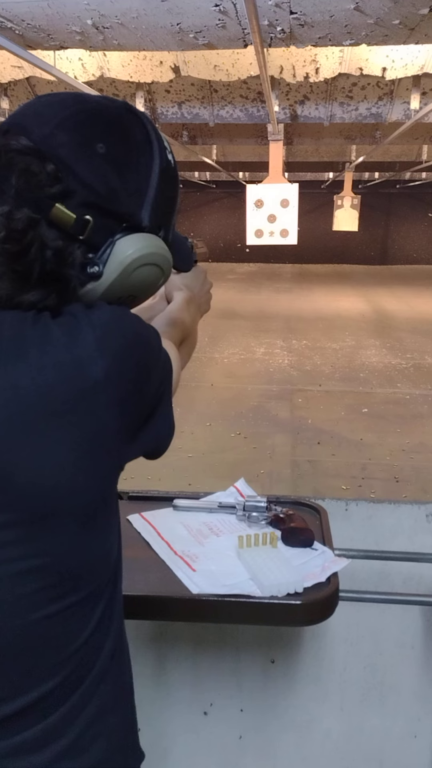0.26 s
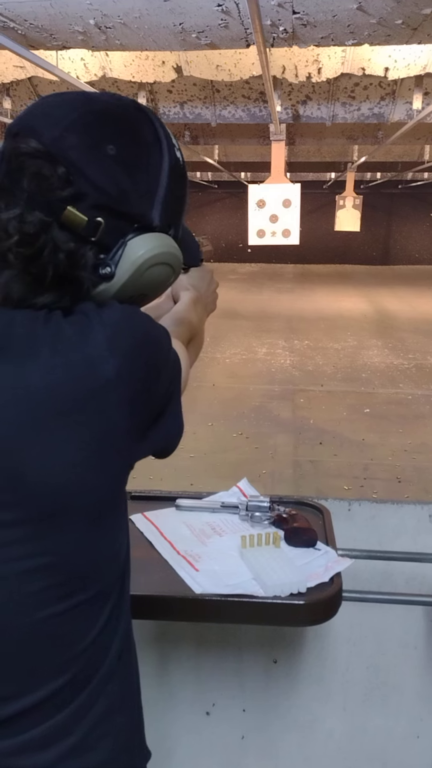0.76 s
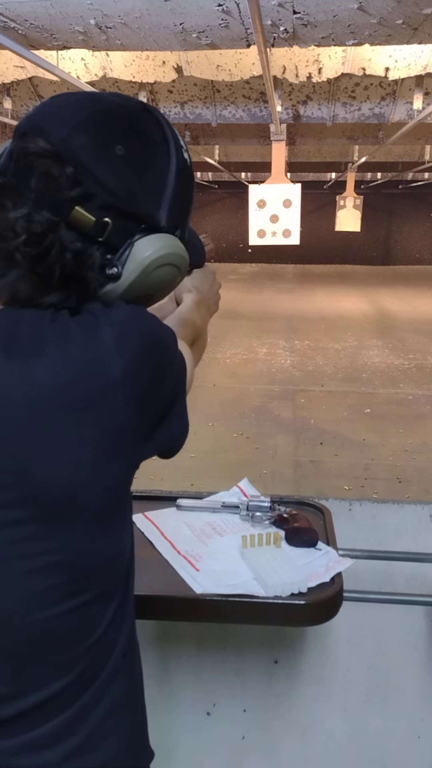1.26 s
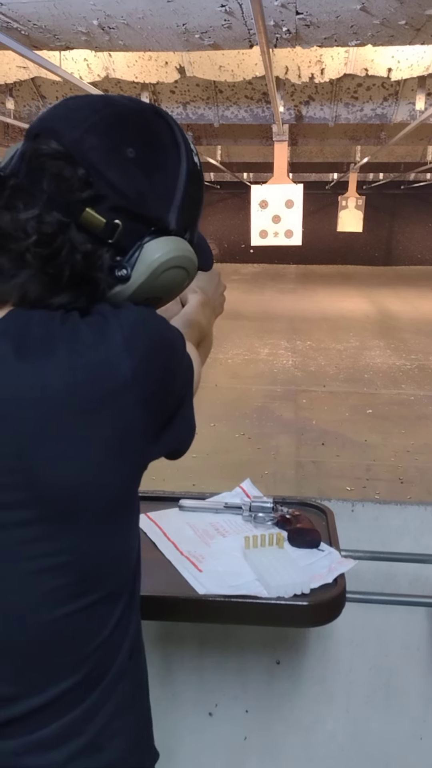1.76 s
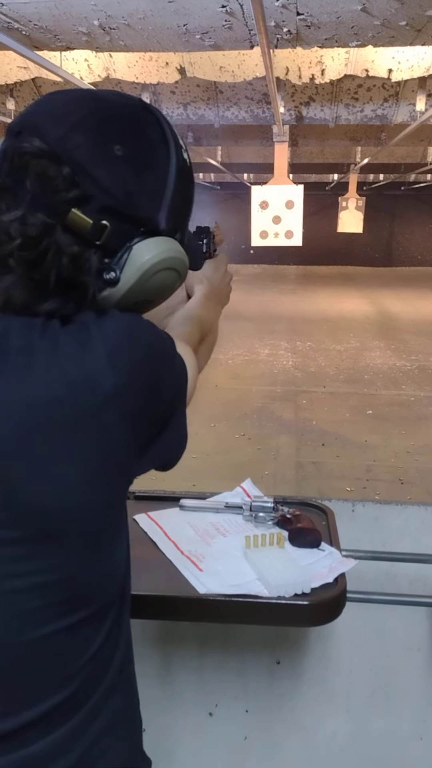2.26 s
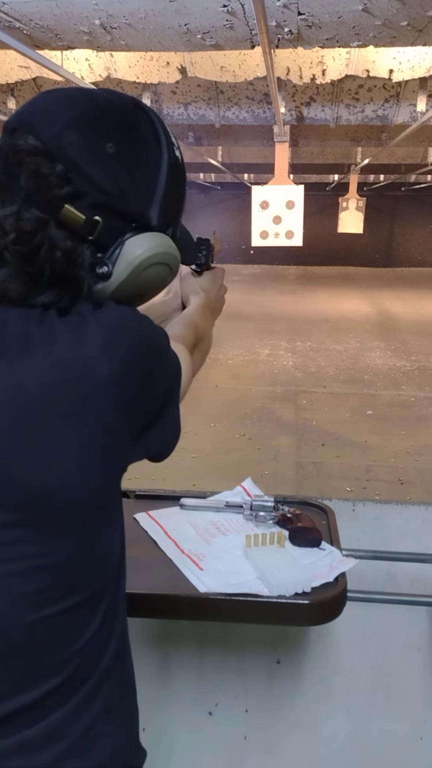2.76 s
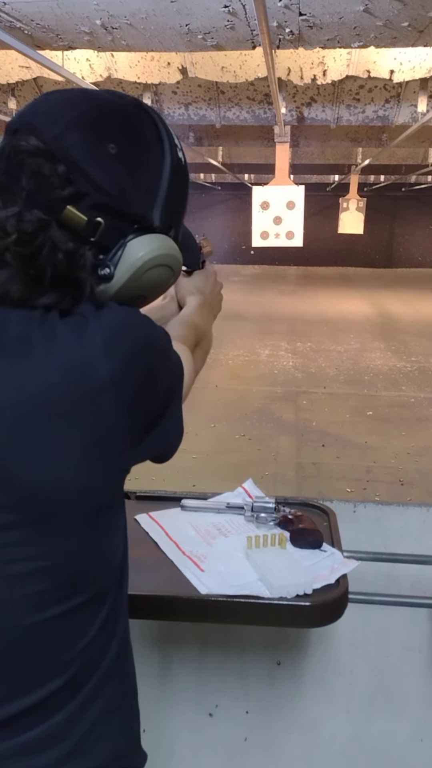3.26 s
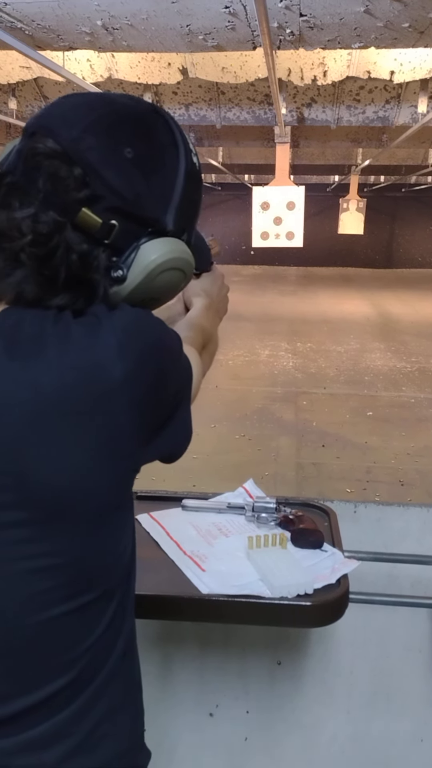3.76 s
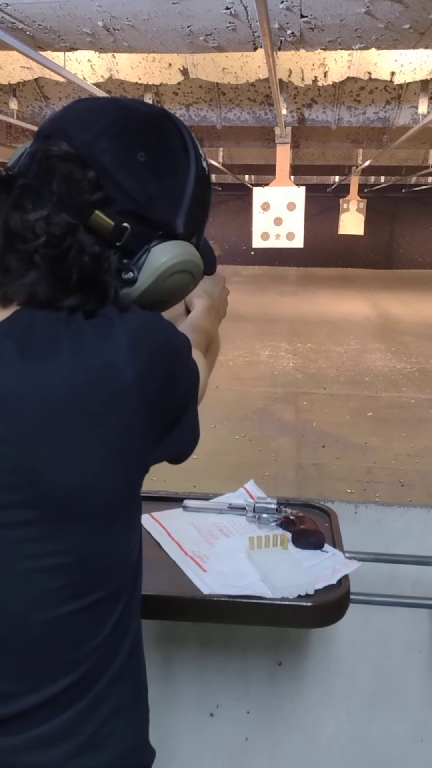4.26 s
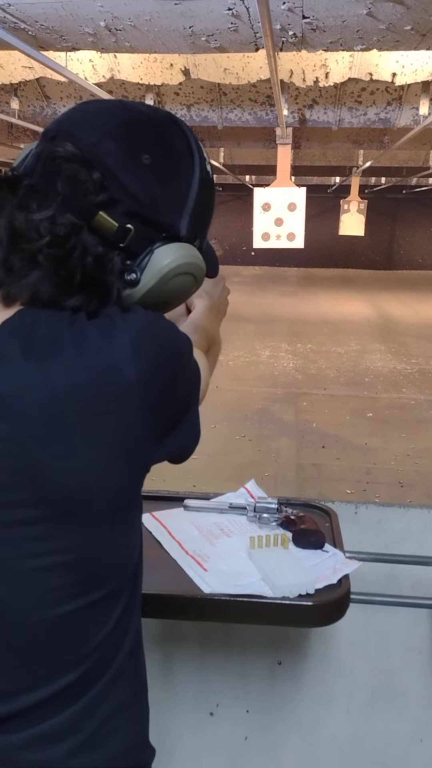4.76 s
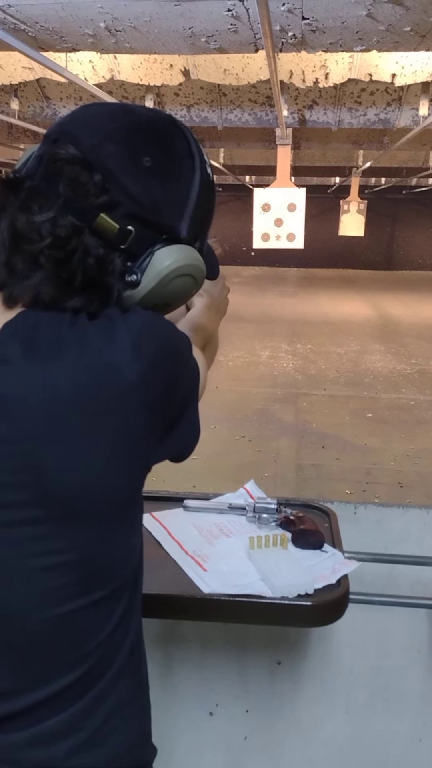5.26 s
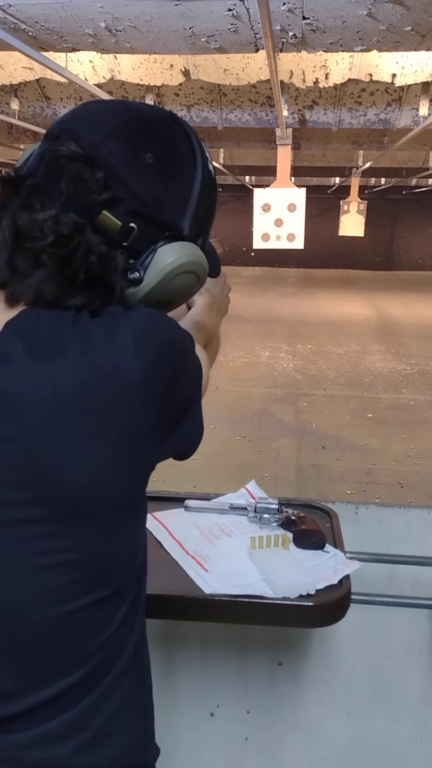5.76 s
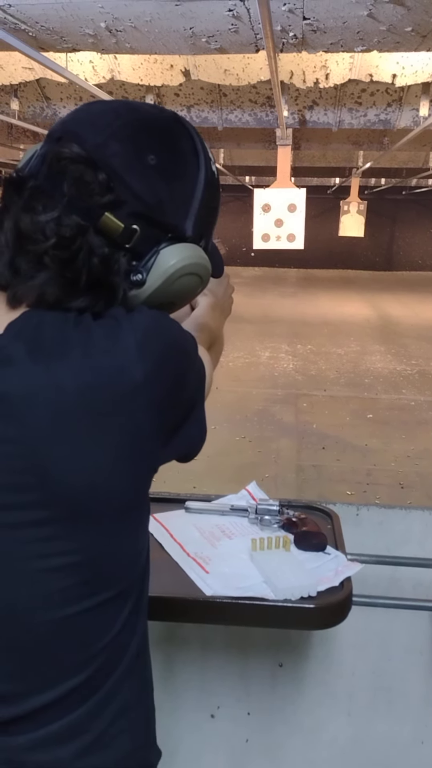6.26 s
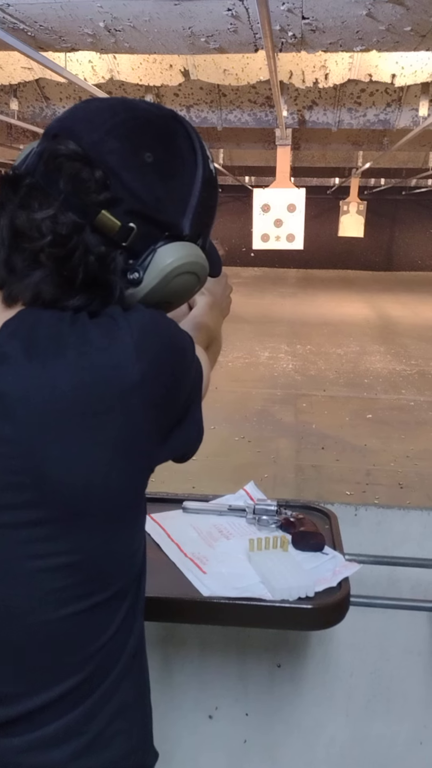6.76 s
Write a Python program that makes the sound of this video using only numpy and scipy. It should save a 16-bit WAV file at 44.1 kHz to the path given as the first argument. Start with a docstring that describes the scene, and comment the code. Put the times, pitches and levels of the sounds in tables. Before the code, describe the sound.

Four loud handgun blasts in a long hard-walled hall, each roaring and ringing out, with brass cases clinking over a low ventilation rush.

```python
"""Handgun fire in a reverberant hall

A handgun is fired four times in a long, hard-walled indoor range with the ventilation running.
Each blast is noise in bands that build up and decay at their own rates, the treble dying first, plus
ringing standing waves and a slap; a limiter holds the roar flat for most of a second. Spent brass cases
bounce as noise-driven resonances; clacks and knocks are short bursts; rustle and air are shaped noise."""
import sys
import numpy as np
from scipy import signal
from scipy.io import wavfile

SR = 44100
rng = np.random.default_rng(int(sys.argv[2]) if len(sys.argv) > 2 else 0)


def wav_record(signal):
    """Record a signal, one row per channel, as 16-bit PCM in the file named by sys.argv[1]."""
    frames = np.transpose(np.atleast_2d(signal))
    bounded = np.clip(frames, -1, 1)
    # unit amplitude maps onto the largest positive 16-bit level
    quanta = np.round(bounded * 32767).astype(np.int16)
    wavfile.write(sys.argv[1], SR, quanta)


N = 309141

# Shots: start_s, level_db, extra_bass_db, extra_treble_db, early_knock_db, slap_db (against level_db),
# bass_build_up_factor, treble_t60_factor, late_swell_s (after the shot), late_swell_db
SHOTS = [(1.9412, 15, 3, 7, -24.5, -32, 1.2215, 1.0533, .7, -1.5),
         (3.6402, 14, -3, 5, -14.5, -7, .9, 0.96164, 0.5637, -5),
         (5.1755, 13.5, -2, 4.5, -16, -10.5, 1.2, 0.98379, 0.5972, -5),
         (6.792, 4, 0.5, 4.5, -17, -11, 1.669, 0.9211, .58, -6.5)]
# Reverberation of the hall: pitch_hz, level_db (per Hz), t60_s, build_up_s, slow_tail_db, decay_bend
HALL = [(45, -20.5, 2.5, 0.36, -30, 1.04), (88.78, -5.5, 2.7402, 0.47, -26.5, 1.1473),
        (164, 4, 1.4443, 0.28, -20, 0.9681), (300.4, 1, 1.5399, 0.25, -29.5, 1.4211),
        (417, 1.5, 1.8758, 0.045, -27, 0.9664), (835.1, 4.5, 1.671, 0.034, -27, 1.0091),
        (1320, 2, 1.7085, 0.0046, -28, 0.88468), (2364.7, -5, 1.7614, 0.0048, -38.5, 1.0625),
        (3033.8, 3.5, 1.2672, 0.03, -46, 1.0477), (4170.5, -2, 0.99217, 0.0057, -55, 1.4117),
        (6488.9, -6, 0.74165, 0.012, -67.5, 1.4139), (9089, -16.5, 0.61543, 0.019, -74.5, 1.4837),
        (13398, -17.5, 0.52857, 0.022, -81.5, 1.585), (16500, -25, .55, 0.017, -82.5, 1.3)]
SLOW_TAIL_T60_S = 4.2664
FIRST_SHARE = 0.295   # part of the roar's amplitude that is there at once
SWELL_WIDTH_S, SWELL_TOP_HZ = 0.12, 480   # bell-shaped late swell, fading out above this pitch
# Renewal of the roar: pitch_hz, fresh_share (part of the power that is shifted in time for each shot)
FRESH_SHARES = [(100, .1), (1000, .2), (4000, .6)]
# Standing waves of the hall: pitch_hz, width_hz, level_db, t60_s
STANDING_WAVES = [(142.73, 22, -6, 2.816), (228.3, 28, -11, 1.3), (352.32, 20, -7, 2.2505),
                  (574.71, 41, 1.5, 2.4585), (599.54, 27, -3, 2.9307), (766.92, 11, 2, 2.0924),
                  (802.93, 14, -7.5, 2.6886), (915.9, 11, -9.5, 0.93), (1008.6, 25, -1.5, 2.9536),
                  (1088.5, 16, -1, 2.3015), (1340.2, 14, -8, 2.804), (1514, 12, -9.5, 0.7),
                  (1797.3, 15, -9.5, 0.67), (2545, 12, -13.5, 0.79)]
STANDING_WAVES_DB = -27.5   # against the level of the shot
KNOCK_LEAD_S, KNOCK_HZ, KNOCK_WIDTH_HZ = 0.0053, 900, 760   # dull knock just ahead of each blast
SLAP_HZ, SLAP_WIDTH_HZ, SLAP_T60_S = 902, 660, .1   # first slap off the booth walls
SLAP_TAIL_DB, SLAP_TAIL_T60_S = -14.5, .7   # weaker, longer part of the slap
THUD_HZ, THUD_WIDTH_HZ, THUD_DB = 230, 280, -4   # low body of the slap
PUSH_HZ, PUSH_WIDTH_HZ, PUSH_DB, PUSH_T60_S = 85, 110, -16.5, .35   # low push of air with the slap
# Late echo, minute and brief: delay_s, level_db (against the shot), pitch_hz, width_hz, broad_crack_db,
# t60_s, left_right_db, rise_s
LATE_ECHO = (1.95, -33.5, 1010, 299.5, -43, 0.0015, -2, 0.48)

# Bounces of brass cases: start_s, body_db, mouth_ring_hz, mouth_ring_db, mouth_ring_t60_s, floor_crack_db
CASES = [(2.515, -42, 12100, -46, 0.2532, -60.5), (2.8217, -18.5, 14970, -27, 0.2524, -31.5),
         (3.3503, -26.5, 14890, -34, 0.2191, -42.5), (4.44, -60.5, 13400, -63.5, .4, -90.5),
         (4.69, -63, 11150, -73, 0.29, -89)]
# Modes of a case body: pitch_hz, width_hz, level_db, t60_s
CASE_MODES = [(3124.5, 223.6, 4, 0.1293), (3879, 300, -14, .08), (5005.4, 150, -19, 0.087),
              (6340, 60, -35, 0.17), (6489.8, 110, -18, 0.044)]
# Crack of a case on the floor: pitch_hz, width_hz, broad_crack_db, t60_s, left_right_db, rise_s
CASE_CRACK = (4000, 3000, 14.342, 0.19487, 3, .0004)
MOUTH_WIDTH_HZ = 60
CLINK_DB, CLINK_T60_S = 4, .035   # part added to the first instant of a bounce

# A loose metal part rattles: start_s, level_db, pitch_hz, touches, broad_crack_db, left_right_db
RATTLES = [(.003, -52, 2298, 1, -3, -4), (.228, -47, 2346, 1, 0.5, -7.5), (.237, -39, 2355, 5, -1, -4),
           (.3865, -56, 2295, 3, -6, -4), (0.435, -53.5, 2367, 3, -5, -5.5), (.654, -56, 2552, 2, 1, 2.5),
           (.999, -53.5, 2549, 2, 1.5, -1), (1.155, -64.5, 3699, 3, -2, 0),
           (1.6922, -53, 2576, 2, 6.5, -1.5)]
TOUCH_S, TOUCH_LOSS_DB = .0152, 2.2   # from one touch to the next
RATTLE_WIDTH_HZ, RATTLE_T60_S, RATTLE_RISE_S = 332.3, .14, .001
# Dull knocks and scuffs: start_s, level_db, pitch_hz, width_hz, t60_s, broad_crack_db
KNOCKS = [(.981, -48.5, 1056, 600, 0.266, -20), (1.11, -50, 750, 700, 0.652, -18),
          (1.259, -48, 850, 700, 0.422, -22), (1.33, -47, 760, 900, 0.57, -20),
          (1.36, -49, 1019, 900, 0.4177, -22.5), (1.55, -51.5, 898, 500, 0.303, -22.5),
          (1.64, -50.5, 936.6, 600, 0.5936, -20.5), (3.0966, -20.5, 1400, 1900, .1, -15),
          (3.109, -21.5, 799.7, 600, 0.0899, -23), (4.9688, -29, 650, 750, .35, -32),
          (4.98, -26, 451.2, 400, 0.5536, -36)]
KNOCK_PAN_DB, KNOCK_RISE_S = -1, 0.001868
# Faint bright ticks: start_s, level_db, pitch_hz, left_right_db
TICKS = [(2.484, -41, 13500, 1), (2.63, -68, 12980, -5), (3.262, -60, 6988, 4), (4.9154, -57, 3018, 0),
         (5.147, -56, 3900, 1.5), (5.912, -65.5, 14040, -11.5)]
TICK_WIDTH_HZ, TICK_CRACK_DB, TICK_T60_S, TICK_RISE_S = 2600, -9, .21, .003
FRONT_DB, FRONT_T60_S = 1.5, 0.027   # part added to the onset of every clack
CRACK_LOW_HZ, CRACK_HIGH_HZ = 900, 5102.4

# Faint high rustle: time_s, rms_db
RUSTLE = [(2.98, -92), (3.08, -62), (3.3, -68), (3.5, -74), (3.6, -95.5)]
RUSTLE_HZ, RUSTLE_WIDTH_HZ = 13490, 4000
# Spectrum of the ventilation: pitch_hz, level_db (per Hz, relative)
AIR = [(15, -69), (25, -39), (105, -1), (153, -14), (190, -3.5), (242, -15), (326, -17.5), (439, -22.5),
       (607, -21.5), (714, -30.5), (2610, -35.5), (3430, -47), (16000, -82.5)]
AIR_DB = -39.5   # rms of the mono mix

# Coherence of the diffuse field at the two ports: pitch_hz, left_right_likeness
LIKENESS = [(60, 0.79), (130, 0.94945), (290, 0.8128), (640, 0.4571), (1410, 0.0067), (3100, 0.0092),
            (6820, 0.02), (15000, 0.01)]
# Balance of the microphone ports: pitch_hz, left_right_db
PORTS = [(60, 7.5), (110, 3), (200, 0.5), (380, 0.5), (700, -1), (1290, -1), (2380, -3.5), (4400, 0),
         (8120, 5.5), (15000, -0.5)]
EDGES = 25 * 2 ** np.arange(0, 9.6, 1 / 6)   # sixth-octave band edges, Hz
CEILING_DB, RELEASE_DB_S, SENSE_S, SMOOTH_S = -12, 99, 0.0034, 0.00034   # limiter
AHEAD = round(.002 * SR)   # look-ahead of the limiter, samples
TOP, HISS_DB, CUTOFF_HZ = 1.0, -80, 16400   # clipping level, recorder noise, upper band limit


def shots():
    """Superposition: each shot sets off the blast's reverberation, standing waves, slap and knock."""
    out = np.zeros((2, N))
    roars(out)
    rings = standing_waves()
    slap = wall_slap()
    for s, shot_db, _, _, knock_db, slap_db, *_ in SHOTS:
        add(out, s, amp(shot_db + STANDING_WAVES_DB) * rings)
        add(out, s, amp(shot_db + slap_db) * slap)
        knock = resonate(rng.standard_normal(round(KNOCK_LEAD_S * SR)), KNOCK_HZ, KNOCK_WIDTH_HZ)
        add(out, s - KNOCK_LEAD_S, amp(knock_db) * knock * np.hanning(len(knock)))
        delay, echo_db, *echo = LATE_ECHO
        if s + delay < N / SR:
            out = clack(out, s + delay, shot_db + echo_db, *echo)
    return out


def roars(out):
    """Reverberation: a diffuse field builds up and decays at a rate that depends on frequency."""
    size = 2 * SR
    t = np.arange(size) / SR
    for hz, band in noise_bands(size):
        level_db, t60, build, tail_db, bend = (at_hz(HALL, hz, order=k) for k in (1, 2, 3, 4, 5))
        tail = amp(tail_db) * dying(size, SLOW_TAIL_T60_S)
        fresh = at_hz(FRESH_SHARES, hz)
        for s, shot_db, bass_db, treble_db, _, _, gather, linger, late, late_db in SHOTS:
            shifted = np.roll(band, round(s * SR), axis=1)
            mixed = np.sqrt(1 - fresh) * band + np.sqrt(fresh) * shifted
            bell = np.exp(-((t - late) / SWELL_WIDTH_S) ** 2)
            bloom = 1 + amp(late_db) * bell / (1 + (hz / SWELL_TOP_HZ) ** 4)
            stretch = np.interp(np.log(hz), np.log([1500, 4000]), [1, linger])
            roar = mixed * bloom * (dying(size, t60 * stretch, bend) + tail)
            # long waves gather slowly down the hall
            build_up = 1 - (1 - FIRST_SHARE) * np.exp(-t / max(build * gather, .001))
            colour_db = np.interp(np.log(hz), np.log([200, 800, 3000, 8000]), [bass_db, 0, 0, treble_db])
            add(out, s, amp(shot_db + level_db + colour_db) * build_up * roar)


def standing_waves():
    """Room modes: narrow resonances between the walls store energy and ring on."""
    size, rings = 2 * SR, 0
    noise = rng.standard_normal((2, size))
    for hz, width_hz, ring_db, t60 in STANDING_WAVES:
        mid, side = resonate(noise, hz, width_hz)
        pair = stereo(mid, side, np.clip(at_hz(LIKENESS, hz), 0, 1))
        rings = rings + amp(ring_db) * pair * dying(size, t60)
    return rings


def wall_slap():
    """Early reflection: a slap off the booth walls, its low thud, a longer tail and a push of air."""
    size = 2 * SR
    first, second = rng.standard_normal((2, size))
    thud = amp(THUD_DB) * resonate(second, THUD_HZ, THUD_WIDTH_HZ)
    slap = (resonate(first, SLAP_HZ, SLAP_WIDTH_HZ) + thud) * dying(size, SLAP_T60_S)
    tail = resonate(second, SLAP_HZ, SLAP_WIDTH_HZ) * dying(size, SLAP_TAIL_T60_S)
    push = resonate(first, PUSH_HZ, PUSH_WIDTH_HZ)[::-1] * dying(size, PUSH_T60_S)
    return slap + amp(SLAP_TAIL_DB) * tail + amp(PUSH_DB) * push


def cases():
    """Modal vibration: each bounce sets the case wall clinking low and its open mouth ringing high."""
    size, out = SR // 2, np.zeros((2, N))
    clink = 1 + amp(CLINK_DB) * dying(size, CLINK_T60_S)
    for s, body_db, mouth_hz, mouth_db, mouth_t60, crack_db in CASES:
        out = clack(out, s, crack_db, *CASE_CRACK)
        noise = rng.standard_normal((2, size))
        for hz, width_hz, mode_db, t60 in CASE_MODES:
            mode = resonate(noise, hz, width_hz) * dying(size, t60)
            add(out, s, amp(body_db + mode_db) * mode * clink)
        mouth = resonate(noise, mouth_hz, MOUTH_WIDTH_HZ) * dying(size, mouth_t60)
        add(out, s, amp(mouth_db) * mouth)
    return out


def clacks():
    """Impact: rattles are runs of ever weaker touches; knocks are low and dull, ticks broad and mostly high."""
    out = np.zeros((2, N))
    for s, level_db, hz, touches, crack_db, pan_db in RATTLES:
        for k in range(round(touches)):
            out = clack(out, s + k * TOUCH_S, level_db - k * TOUCH_LOSS_DB, hz, RATTLE_WIDTH_HZ,
                        crack_db, RATTLE_T60_S, pan_db, RATTLE_RISE_S)
    for s, level_db, hz, width_hz, t60, crack_db in KNOCKS:
        out = clack(out, s, level_db, hz, width_hz, crack_db, t60, KNOCK_PAN_DB, KNOCK_RISE_S)
    for s, level_db, hz, pan_db in TICKS:
        out = clack(out, s, level_db, hz, TICK_WIDTH_HZ, TICK_CRACK_DB, TICK_T60_S, pan_db, TICK_RISE_S)
    return out


def clack(out, s, level_db, hz, width_hz, crack_db, t60, pan_db, rise):
    """Damped excitation: a resonance and a broad crack, tinged with white noise, die away together."""
    size = SR // 2
    onset = 1 - np.exp(-np.arange(size) / SR / rise)
    front = (1 + amp(FRONT_DB) * dying(size, FRONT_T60_S)) * onset
    noise = rng.standard_normal((3, 2, size))
    broad = signal.butter(2, [CRACK_LOW_HZ, CRACK_HIGH_HZ], "band", fs=SR)
    crack = signal.lfilter(*broad, noise[1]) + amp(-30) * noise[2] * dying(size, 0.058)
    burst = (resonate(noise[0], hz, width_hz) + amp(crack_db) * crack) * dying(size, t60) * front
    sound = np.zeros_like(out)
    add(sound, s, amp(level_db + np.array([[pan_db], [-pan_db]]) / 2) * burst)
    return out + sound


def rustle():
    """Amplitude modulation: high band noise swells and fades along a level curve."""
    s, level_db = np.transpose(RUSTLE)
    hiss = resonate(rng.standard_normal((2, N)), RUSTLE_HZ, RUSTLE_WIDTH_HZ)
    return amp(np.interp(np.arange(N) / SR, s, level_db, -120, -120)) * hiss


def ventilation():
    """Flow noise: moving air makes a steady, mostly low rush."""
    # the first second is dropped so that the filters have settled
    rush = sum(amp(at_hz(AIR, hz)) * band[:, SR:] for hz, band in noise_bands(N + SR))
    return amp(AIR_DB) * rush / rush.mean(axis=0).std()


def noise_bands(size):
    """Diffuse field: sixth-octave noise bands, flat per Hz, with the coherence and balance of two ports."""
    white = rng.standard_normal((2, 2, size))
    for k, (low, high) in enumerate(zip(EDGES, EDGES[1:])):
        band_pass = signal.butter(4, [low, high], "band", fs=SR, output="sos")
        mid, side = signal.sosfilt(band_pass, white[k % 2])   # neighbouring bands use separate noise
        hz = np.sqrt(low * high)
        pair = stereo(mid, side, np.clip(at_hz(LIKENESS, hz), -1, 1))
        lean = at_hz(PORTS, hz) / 2
        yield hz, pair * amp([[lean], [-lean]])


def stereo(mid, side, alike):
    """Coherence: the shares of common and opposed noise set the left-right correlation."""
    return np.sqrt(1 + alike) * mid + np.sqrt(1 - alike) * side * [[1], [-1]]


def resonate(x, hz, width_hz):
    """Resonance: a two-pole filter applied twice for steep skirts, scaled to rms 1."""
    r = np.exp(-np.pi * width_hz / SR)
    b = [1, 0.0077, -1.0064]
    a = [1, -2 * r * np.cos(2 * np.pi * hz / SR), r * r]
    x = signal.lfilter(b, a, signal.lfilter(b, a, x))
    return x / x.std()


def dying(size, t60, bend=1):
    """Decay: the envelope falls 60 dB in t60 s; with bend over 1 it lingers, then drops ever faster."""
    return amp(-60 * (np.arange(size) / SR / t60) ** bend)


def lag(x, seconds):
    """Relaxation: one-pole smoothing with a time constant."""
    r = np.exp(-1 / (seconds * SR))
    return signal.lfilter([1 - r], [1, -r], x)


def amp(db):
    """Decibel law: the gain of a level in dB."""
    return 10 ** (np.asarray(db) / 20)


def at_hz(rows, hz, order=1):
    """Interpolation: one column of a table, read on a log-frequency axis."""
    rows = np.array(rows)
    return np.interp(np.log(hz), np.log(rows[:, 0]), rows[:, order])


def add(out, s, sound):
    """Superposition: mixes a sound in at time s, in seconds."""
    at = round(s * SR)
    out[:, at:at + sound.shape[-1]] += sound[..., :N - at]


def scene():
    """Superposition: all sources at the microphone ports."""
    return shots() + cases() + clacks() + rustle() + ventilation()


def record(dry):
    """Limiting: gain follows short-term power, looks ahead and recovers at a set rate; overshoots clip."""
    level_db = 10 * np.log10(lag((dry ** 2).mean(axis=0), SENSE_S) + 1e-12)
    ramp = RELEASE_DB_S * np.arange(N) / SR
    held_db = np.maximum.accumulate(level_db + ramp) - ramp   # falls no faster than the release
    gain_db = lag(lag(np.minimum(CEILING_DB - held_db, 0), SMOOTH_S), SMOOTH_S)
    early_gain_db = np.append(gain_db[AHEAD:], [gain_db[-1]] * AHEAD)
    limited = np.clip(dry * amp(early_gain_db), -TOP, TOP)
    noisy = limited + amp(HISS_DB) * rng.standard_normal(dry.shape)
    return signal.sosfilt(signal.cheby2(20, 60, CUTOFF_HZ, fs=SR, output="sos"), noisy)


dry = scene()
out = record(dry)
wav_record(out)
```